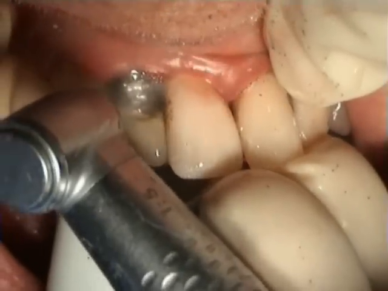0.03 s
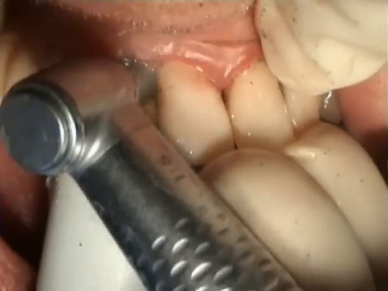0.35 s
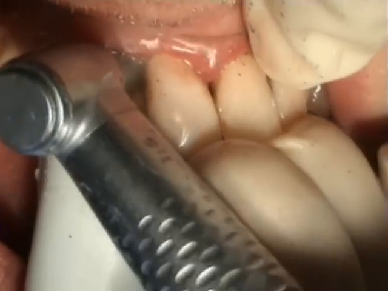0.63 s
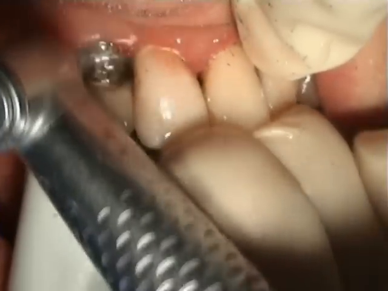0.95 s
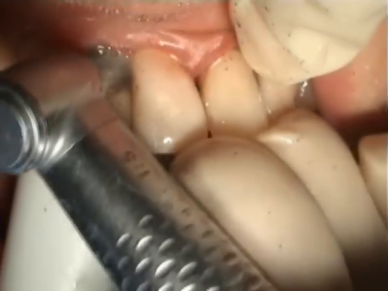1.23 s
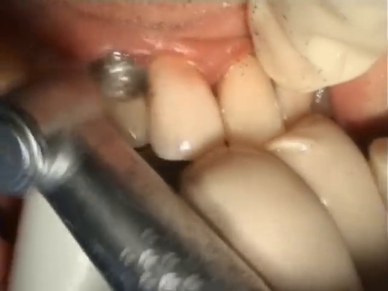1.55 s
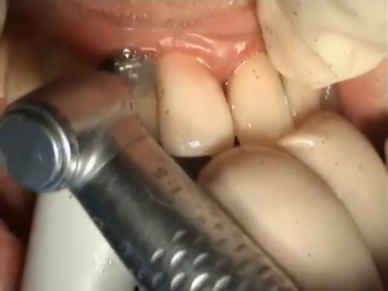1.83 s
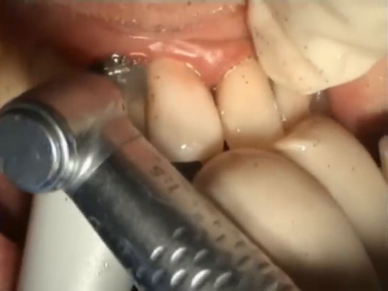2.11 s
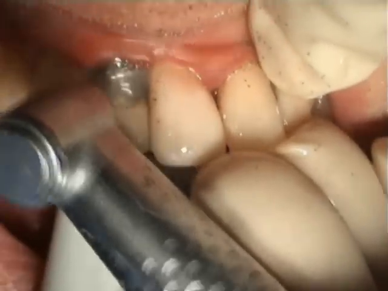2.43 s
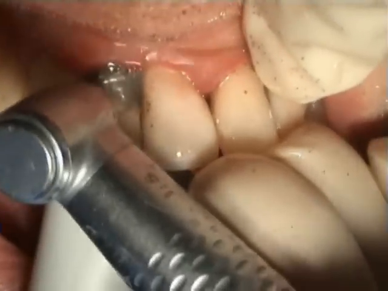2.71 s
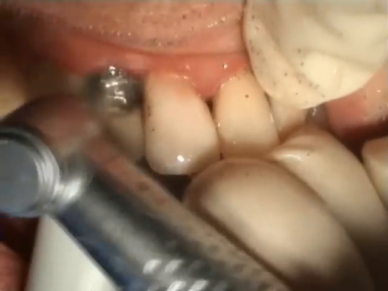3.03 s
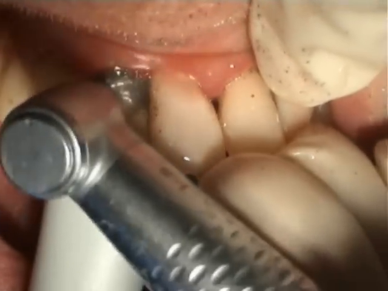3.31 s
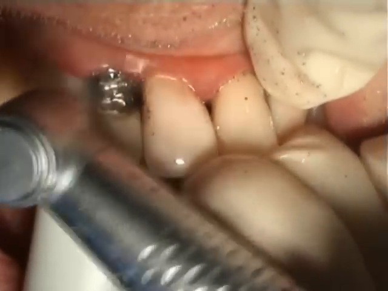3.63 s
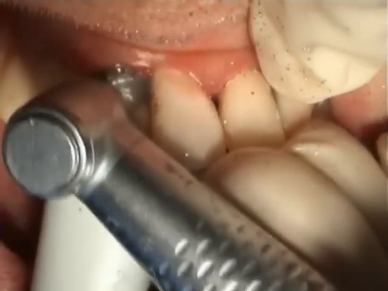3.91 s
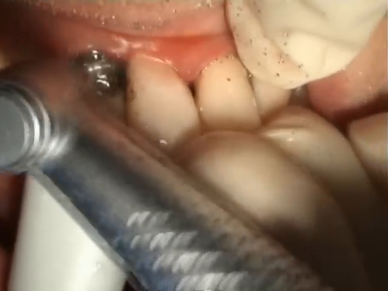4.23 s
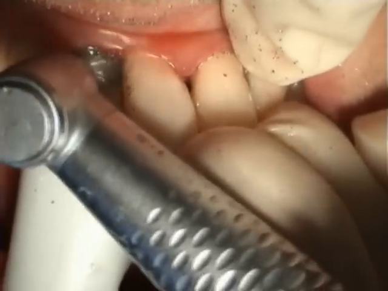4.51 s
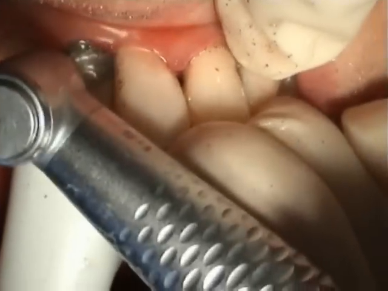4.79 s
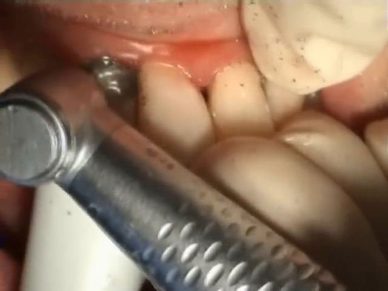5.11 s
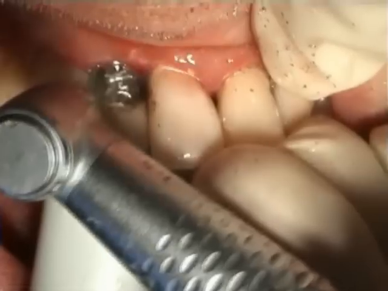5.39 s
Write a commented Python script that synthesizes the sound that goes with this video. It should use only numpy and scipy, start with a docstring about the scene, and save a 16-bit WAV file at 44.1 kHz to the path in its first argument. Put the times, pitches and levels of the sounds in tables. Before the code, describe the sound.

A high-speed dental drill whines and hisses up close, dipping in pitch and squealing each time it bites into metal.

```python
"""At a dentist's chair, a stereo microphone close to a handpiece cutting a metal post in a mouth.
From the start, cooling air and spray rush and ring in the hollows around the head, and the bur whines
at a governed speed over faint room ventilation. A graze at 0.3 s opens a run of strokes: each bite
sags the speed and brings out a squeal of higher harmonics and a gritty hiss. From about 1.7 s the
spray whistles whenever the head draws back, last at 5.5 s, after the final stroke."""
import sys
import numpy as np
from scipy import signal
from scipy.fft import rfft, irfft, next_fast_len
from scipy.io import wavfile
from scipy.ndimage import uniform_filter1d, map_coordinates

SR = 44100
rng = np.random.default_rng(int(sys.argv[2]) if len(sys.argv) > 2 else 0)


def persist_wave(psi):
    """Save psi, clipped to +-1, as 16-bit WAV."""
    counts = np.round(np.clip(psi, -1, 1) * 32767).astype(np.int16)
    wavfile.write(sys.argv[1], SR, np.atleast_2d(counts).T)


N = 244748

# how noise reaches the two microphones: frequency_hz, likeness, left_over_right_db, left_lead_rad
NOISE_IMAGE = [(100, 0.76, .5, 0), (500, 0.71, 0, -0.029), (1400, 1, -0.5, -0.037),
               (1690, 0.96, -1.5, 0.33), (2600, 1, -.2, 0.2), (4500, 0.8, 1.5, 0.32), (5050, 0.92, 0, 0),
               (6100, 0.98, 4.5, .15), (6660, 0.69, -2, -0.023), (8150, 0.82, 2.5, 0.11),
               (9900, 0.42, 1.5, -0.56), (10800, 0.74, 1.5, -.5), (12400, 0.81, -1.8, -0.2),
               (15000, .57, 1.5, -.2)]
# colour of the cooling air and spray: frequency_hz, relative_db
JET_SPECTRUM = [(500, -25.5), (1200, -8.5), (2650, -6), (3050, -2.5), (3700, -4.5), (4900, -4.5),
                (5700, -5.5), (6650, 1.5), (7400, -1.5), (8600, -3), (10300, -8.5), (12000, -1),
                (13500, -9.5), (15800, -14)]
# air resonances of the mouth's hollow: centre_hz, width_hz, relative_db
MOUTH_MODES = [(1303, 310, -11.5), (1637, 330, 1), (1808, 280, -1.5)]
# the hollow's level as the hand drifts, before load shades it: time_s, level_db
MOUTH_DRIFT = [(0.1, -42), (0.5, -44.0), (2.6, -45.5), (3.2, -43.5), (3.95, -44.5), (4.35, -46),
               (5.2, -44.5), (5.55, -48)]
# air resonances of the gap between head and tooth: centre_hz, width_hz, relative_db
GAP_MODES = [(4704, 320, -9), (5100, 460, -8), (5695, 570, -11)]
# colour of the room's ventilation: frequency_hz, relative_db
VENT_SPECTRUM = [(20, -2), (60, -1.5), (200, -0.5), (450, -1), (650, 2), (900, 1), (1500, -17), (4000, -29)]
# where the bur's five harmonics sit between the microphones: left_over_right_db, left_lead_rad
HARMONIC_IMAGE = [(-0.7, 0.15), (1.5, 0.054), (4.5, -0.013), (-3, -.18), (0, -.34)]
# first harmonic of the free-running bur as the head turns in the hand: time_s, level_db
FIRST_HARMONIC_DRIFT = [(0.1, -49.5), (0.6, -55.5), (1.8, -55), (2.55, -62), (3.25, -57.5), (3.95, -56.5),
                        (4.6, -54.5), (5.55, -56)]
# motor, gear and bearing lines: multiple_of_bur_speed, free_db, full_load_db
GEAR_LINES = [(.2, -67.5, -76), (.75, -61.5, -70), (.83, -64.5, -73), (1.5, -62, -74), (3.5, -76, -62),
              (4.5, -76, -64), (4.69, -78, -62)]
# strokes on the post, from grazes to deep bites; sag and levels are changes at full drag or contact:
# start_s, press_s, hold_s, release_s, sag_hz, first_db, second_db, squeal_db, grit_db, gap_db
BUR_STROKES = [(0.255, 0.16, 0.25, 0.03, 3.05, 1.5, -0.5, 7, 4, -1),
               (0.614, 0.26, 0.031, 0.09, 280, 9.5, -10, 20, 6, -8),
               (1.4, 0.085, 0.0072, 0.138, 219, 6, -13, 17, 6.5, -5),
               (1.835, 0.4, 0.036, 0.185, 468, 3, -15, 22, 7, 2.5),
               (2.409, 0.04, 0.02, 0.13, 70, 4, -2, 9, 2.5, -1.5),
               (2.631, 0.179, 0.063, 0.206, 400, 6.5, -12, 12, 6, -3),
               (3.276, 0.2, 0.13, 0.098, 340, 6.5, -15, 22, 4.5, -5),
               (4.009, 0.204, 0.045, 0.075, 444, 9.5, -15, 25, 3, -4.5),
               (4.45, 0.003, 0.0012, 0.073, 117, 1.5, -7, 4, 1, 1),
               (4.585, 0.127, 0.232, 0.162, 206, 6.5, -4.5, 18.5, 4, -3),
               (4.998, 0.11, 0.215, 0.087, 226, 6, -4.5, 18.5, 3.5, -2.5)]
# colour of the bur grinding metal: frequency_hz, relative_db
GRIT_SPECTRUM = [(3000, -26), (7000, -9), (8900, 2), (9900, 0), (10900, 2), (12000, -2.5), (13500, -6),
                 (15800, -8.5)]
# the head draws back: middle_s, length_s, whistle_db, first_change_db, second_change_db
HEAD_LIFTS = [(1.85, 0.44, -47, 1, 2), (2.6, 0.24, -45, -3, 1), (3.767, 0.24, -43, 9.5, 0),
              (4.413, 0.25, -43.5, 11, -10), (5.48, 0.37, -46, 10.5, -6)]
# resonance of the spray blowing freely past the post: centre_hz, width_hz, relative_db
WHISTLE_MODES = [(4920, 480, 0)]

FREE_HZ, FULL_LOAD_SAG_HZ = 3333, 293  # governed speed; the sag that counts as full load
SECOND_DB, SQUEAL_DB, JET_DB, GAP_DB, GRIT_DB = -45, -68.0, -38.5, -45.5, -46.0  # running free
MOUTH_SHADE_DB, LIFT_GRIT_DB = -2, -1.5  # full load shades the hollow; drawing back thins the grit
SIDES = np.array([[.5], [-.5]])  # left and right each take half of a pan or a phase lead


def amp(db):
    """Decibels to gain."""
    return 10 ** (np.asarray(db) / 20)


def along(points, hz):
    """Read (frequency_hz, value) points on a log axis."""
    knots_hz, values = np.transpose(points)
    return np.interp(np.log(hz + 1), np.log(knots_hz + 1), values)


def curve(points):
    """Join (time_s, value) points into one value per sample."""
    return np.interp(np.arange(N) / SR, *np.transpose(points))


def wobble(rate):
    """A smooth random curve, rate knots a second."""
    knots = rng.standard_normal(int(N * rate / SR) + 4)
    return map_coordinates(knots, [np.arange(N) * rate / SR])


def filtered(x, response):
    """Filter x by a response of frequency."""
    size = next_fast_len(N + SR // 2)
    return irfft(rfft(x, size) * response(np.fft.rfftfreq(size, 1 / SR)), size)[..., :N]


def resonances(modes, hz):
    """Gain of steep-sided resonances whose powers add."""
    powers = (amp(2 * db) / (1 + ((hz - centre) / width * 2) ** 2) ** 2 for centre, width, db in modes)
    return np.sqrt(sum(powers))


def microphones(hz):
    """Complex gains, left and right, for the shared and the opposed part of a noise."""
    knots_hz, *columns = np.transpose(NOISE_IMAGE)
    likeness, pan_db, lead = [along(np.c_[knots_hz, column], hz) for column in columns]
    spread = np.arccos(np.clip(likeness, -1, 1)) / 2
    place = amp(SIDES * pan_db) * np.exp(1j * SIDES * lead)
    return np.array([place * np.cos(spread), place * np.sin(spread) * np.sign(SIDES)])


def rush(colour, excitation=1):
    """Coloured noise of rms 1, as the two microphones pick it up."""
    noise = excitation * rng.standard_normal((2, 1, N))
    stereo = filtered(noise, lambda hz: colour(hz) * microphones(hz)).sum(axis=0)
    return stereo / np.sqrt(np.mean(stereo ** 2) + 1e-20)


def spray(mouth_db, gap_db, flutter_db=0.94, sputter_db=0.96):
    """Air and spray hiss and blow across the mouth's hollow and the gap between head and tooth."""
    jet = rush(lambda hz: amp(along(JET_SPECTRUM, hz)), amp(sputter_db * wobble(2500)))
    mouth = rush(lambda hz: resonances(MOUTH_MODES, hz))
    gap = rush(lambda hz: resonances(GAP_MODES, hz))
    return amp(JET_DB + flutter_db * wobble(30)) * jet + amp(mouth_db) * mouth + amp(gap_db) * gap


def ventilation(level_db=-58.5):
    """The room's ventilation: a low, steady rush behind the handpiece."""
    return amp(level_db) * rush(lambda hz: amp(along(VENT_SPECTRUM, hz)))


def bur(angle, load, first_db, second_db, squeal_db, rattle_rad=0.1,
        flare_db=2.5, flutter_db=1.36, stutter_db=2.2, chatter_db=2.0, drift_db=4.0):
    """Unbalance and blade contacts sound at multiples of the turning speed and stutter under load."""
    # harmonics three to five are the squeal, which flares by chance
    upper_db = [squeal_db + db + flare_db * load * wobble(17) for db in (0, -3.5, -14.0)]
    rattled = angle + rattle_rad * load * wobble(500)  # the bur rattles against the metal
    whine = np.zeros((2, N))
    for k, (db, (pan_db, lead)) in enumerate(zip([first_db, second_db, *upper_db], HARMONIC_IMAGE), 1):
        unsteady_db = flutter_db * wobble(35)
        unsteady_db += load * (stutter_db * wobble(70) + chatter_db * wobble(320))
        pan = amp(SIDES * (pan_db + drift_db * wobble(4.7)))
        whine += amp(db + unsteady_db) * pan * np.sqrt(2) * np.sin(k * rattled + SIDES * lead)
    return whine


def gears(angle, load, flutter_db=3.5, slip_rad=0.55):
    """The motor, at a fifth of the bur's speed, gears and bearings add lines that load damps or wakes."""
    lines = np.zeros(N)
    for multiple, free_db, loaded_db in GEAR_LINES:
        db = free_db + (loaded_db - free_db) * load + flutter_db * wobble(20)
        lines += amp(db) * np.sqrt(2) * np.sin(multiple * angle + slip_rad * wobble(60))
    return lines


def stroke_drag(start, press, hold, release, rotor_lag_s=0.03):
    """Drag, 0-1: the hand leans in, holds and lets go, and the rotor lags behind."""
    corners_s = start + np.cumsum([0, press, hold, release])
    hand = curve(np.c_[corners_s, [0, 1, 1, 0]])
    inertia = np.exp(-1 / (rotor_lag_s * SR))
    return signal.lfilter([1 - inertia], [1, -inertia], hand)


def stroke_contact(start, press, hold, release, bite_share=0.73, let_go_share=0.42, let_go_s=0.046):
    """Contact, 0-1: the flutes engage before the speed bottoms out and let go abruptly as it recovers."""
    let_go = start + press + hold + let_go_share * release
    corners_s = [start, start + bite_share * press, let_go, let_go + let_go_s]
    return curve(np.c_[corners_s, [0, 1, 1, 0]])


def grown(changes_db, envelopes, power):
    """Each stroke's change in dB, growing as a power of its envelope; overlapping strokes share it."""
    total = np.maximum(envelopes.sum(axis=0), 1e-9)
    return (changes_db @ envelopes) / total * np.minimum(total, 1) ** power


def strokes():
    """Drag slows the bur and damps harmonic two; contact wakes the rest and grit, and alters the gap."""
    drag = np.array([stroke_drag(*row[:4]) for row in BUR_STROKES])
    contact = np.array([stroke_contact(*row[:4]) for row in BUR_STROKES])
    sag_hz, first_db, second_db, squeal_db, grit_db, gap_db = np.transpose(BUR_STROKES)[4:]
    return (sag_hz @ drag, grown(first_db, contact, power=1), grown(second_db, drag, power=1),
            grown(squeal_db, contact, power=0.56), grown(grit_db, contact, power=0.46),
            grown(gap_db, contact, power=0.93))


def grinding(level_db, grain_db=2.5, judder_db=1.2):
    """Tiny chips tear off the post: a dense, bright grit that judders at random."""
    grit = rush(lambda hz: amp(along(GRIT_SPECTRUM, hz)), amp(grain_db * wobble(5000)))
    return amp(level_db + judder_db * wobble(60)) * grit


def rasp(angle, load, first_db, relative_db=-8.0):
    """A biting bur whirls unevenly: a rough band around the first harmonic."""
    band = wobble(300) * np.cos(angle) + wobble(300) * np.sin(angle)
    return amp(first_db + relative_db) * load * band


def lifts():
    """The head draws back in smooth swells: extent 0-1, whistle gain, dB changes of two harmonics."""
    t = np.arange(N) / SR
    swells = np.array([np.cos(np.pi * np.clip((t - middle) / length, -.5, .5)) ** 2
                       for middle, length, *_ in HEAD_LIFTS])
    whistle_db, first_db, second_db = np.transpose(HEAD_LIFTS)[2:]
    return swells.sum(axis=0), amp(whistle_db) @ swells, first_db @ swells, second_db @ swells


def whistle(gain):
    """With the head drawn back, the spray blows freely past the post in a narrow, breathy band."""
    return gain * rush(lambda hz: resonances(WHISTLE_MODES, hz))


def scene():
    """Close to the mouth: strokes slow and roughen the bur in the spray; lifts let the spray whistle."""
    sag_hz, bite_first_db, bite_second_db, bite_squeal_db, bite_grit_db, bite_gap_db = strokes()
    lifted, whistle_gain, lift_first_db, lift_second_db = lifts()
    load = np.clip(sag_hz / FULL_LOAD_SAG_HZ, 0, 1)
    jitter_hz = (1.5 + 4 * load) * wobble(70) + (3 + 6 * load) * wobble(16)
    angle = 2 * np.pi * np.cumsum(FREE_HZ - sag_hz + jitter_hz) / SR
    first_db = curve(FIRST_HARMONIC_DRIFT) + bite_first_db + lift_first_db
    second_db = SECOND_DB + bite_second_db + lift_second_db
    whine = bur(angle, load, first_db, second_db, SQUEAL_DB + bite_squeal_db)
    handpiece = whine + rasp(angle, load, first_db) + gears(angle, load)
    air = spray(curve(MOUTH_DRIFT) + MOUTH_SHADE_DB * load, GAP_DB + bite_gap_db)
    air += whistle(whistle_gain)
    chips = grinding(GRIT_DB + bite_grit_db + LIFT_GRIT_DB * lifted)
    return handpiece + air + chips + ventilation()


def record(dry, steadying=0.46, memory_s=0.067, top_hz=15760):
    """Gain control after the microphone evens out swells; nothing passes above the band limit."""
    power = np.abs(uniform_filter1d(np.mean(dry ** 2, axis=0), int(memory_s * SR))) + 1e-12
    gain = (power / power.mean()) ** (-steadying / 2)
    return filtered(dry * gain, lambda hz: hz < top_hz)


dry = scene()
out = record(dry)
persist_wave(out)
```